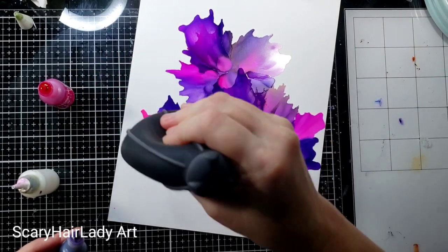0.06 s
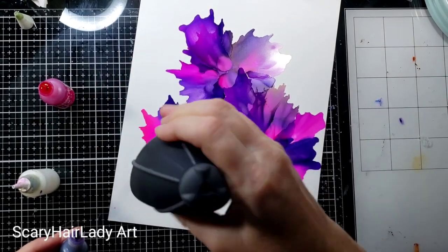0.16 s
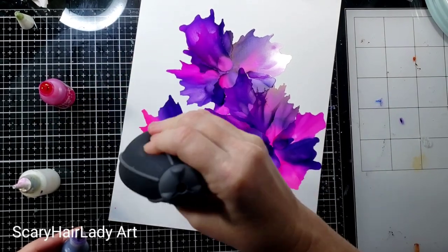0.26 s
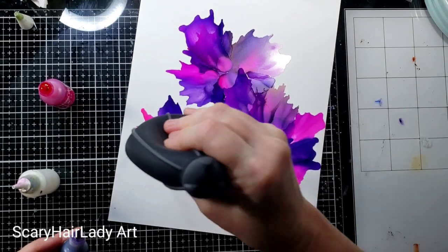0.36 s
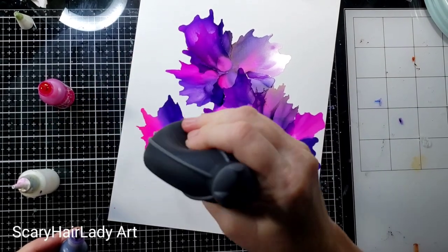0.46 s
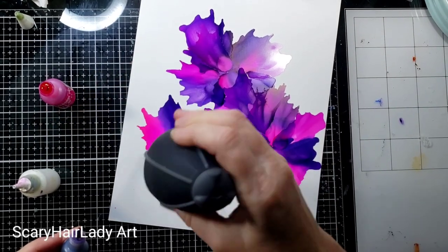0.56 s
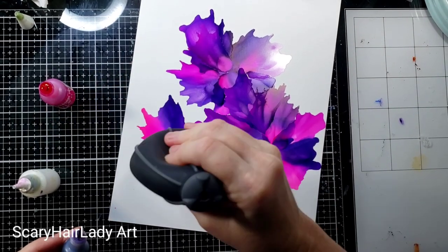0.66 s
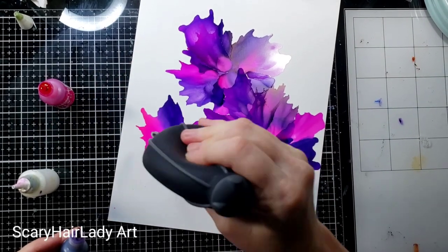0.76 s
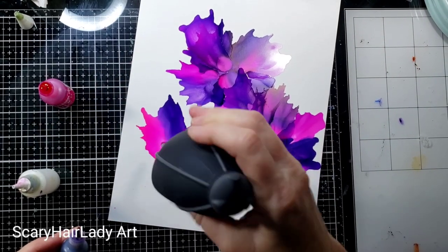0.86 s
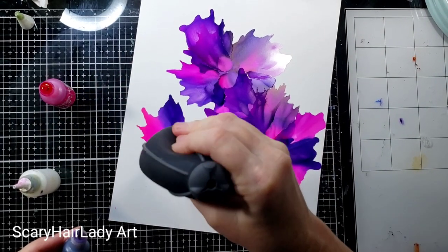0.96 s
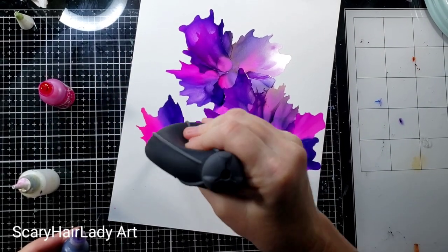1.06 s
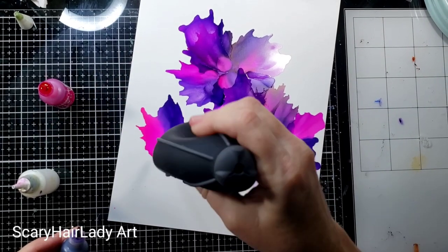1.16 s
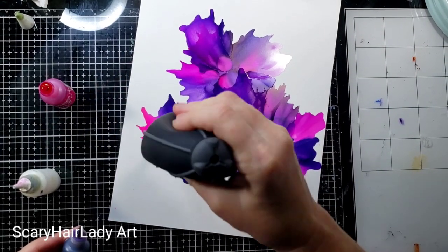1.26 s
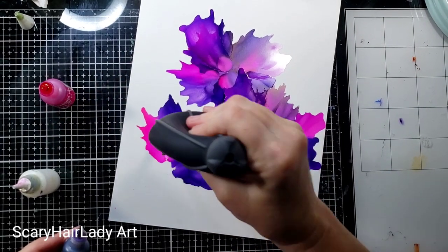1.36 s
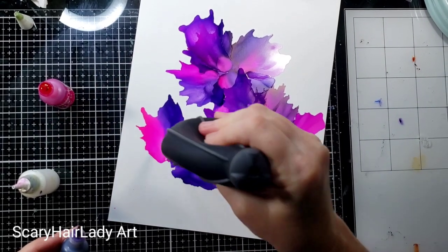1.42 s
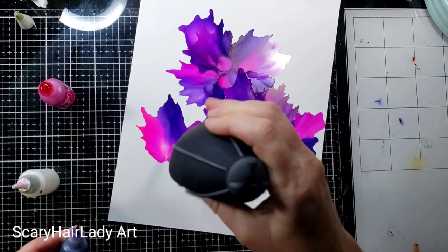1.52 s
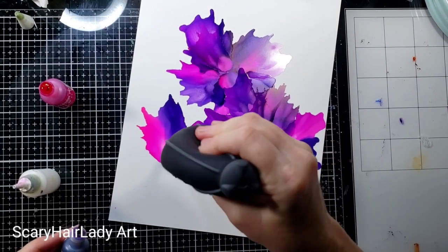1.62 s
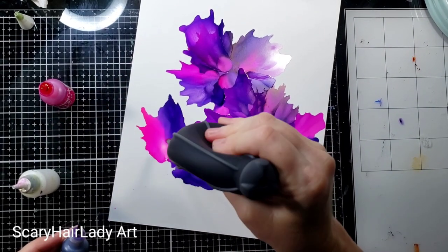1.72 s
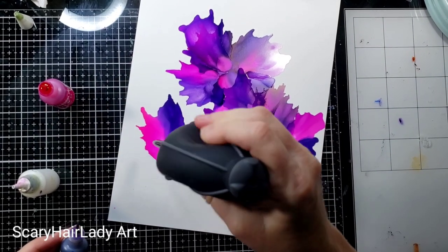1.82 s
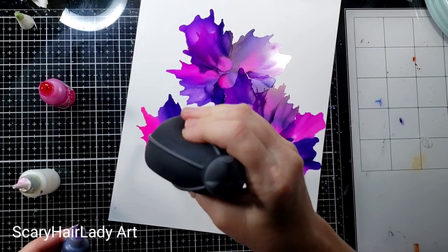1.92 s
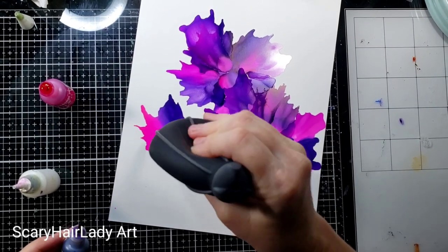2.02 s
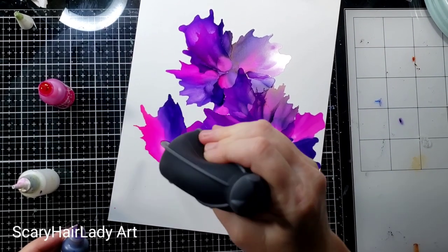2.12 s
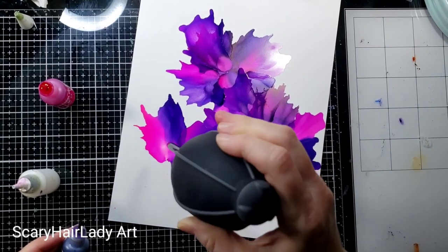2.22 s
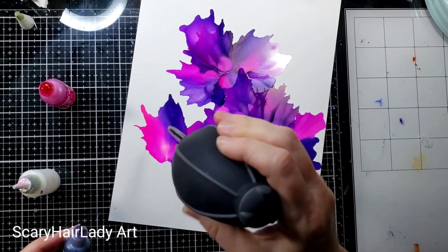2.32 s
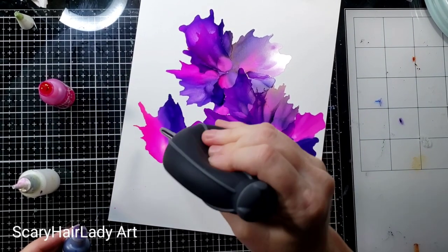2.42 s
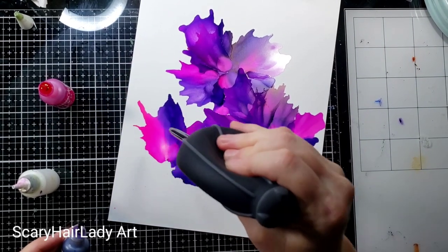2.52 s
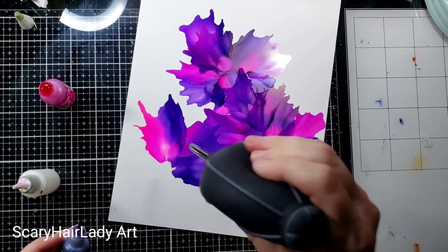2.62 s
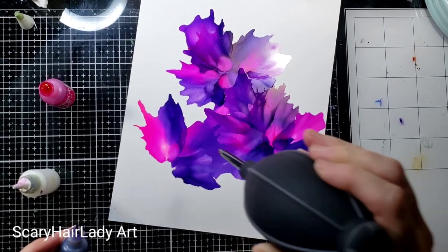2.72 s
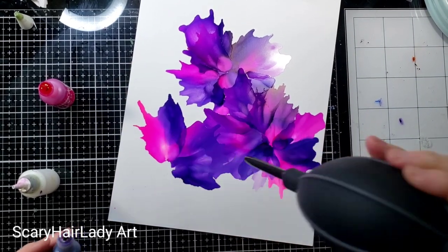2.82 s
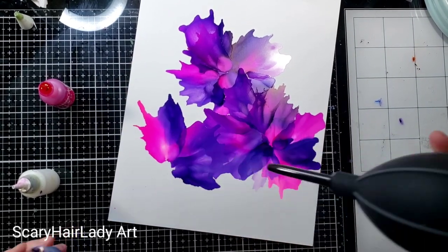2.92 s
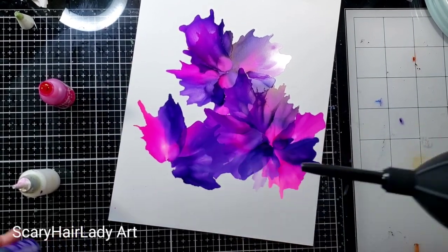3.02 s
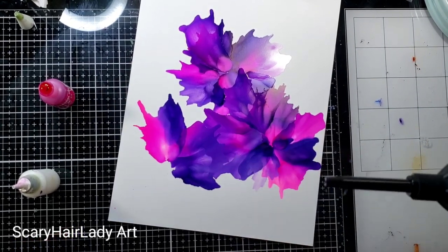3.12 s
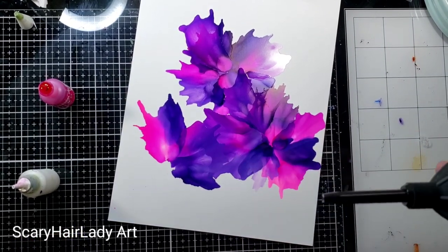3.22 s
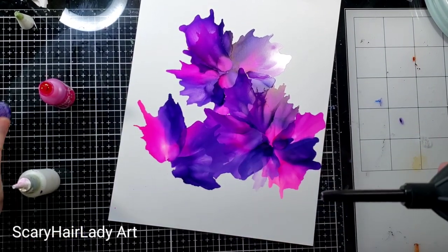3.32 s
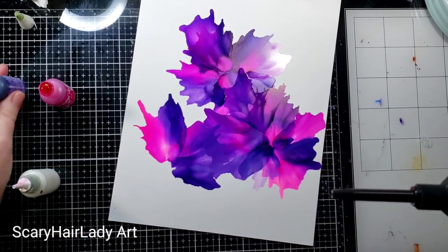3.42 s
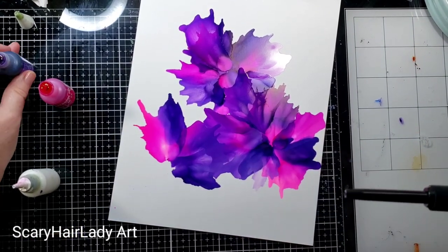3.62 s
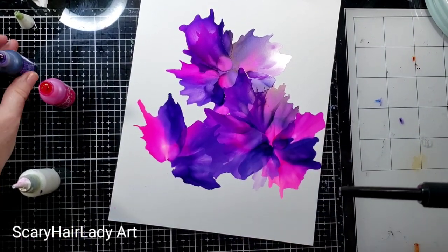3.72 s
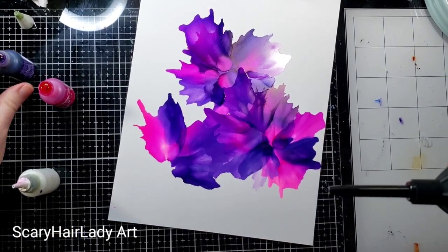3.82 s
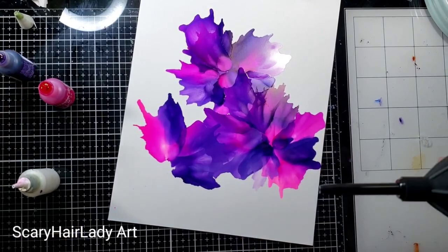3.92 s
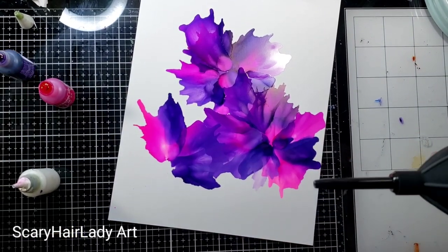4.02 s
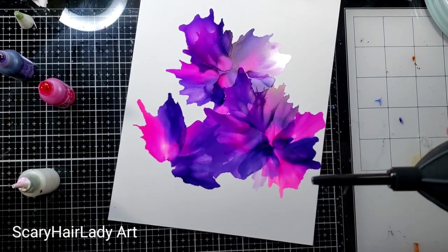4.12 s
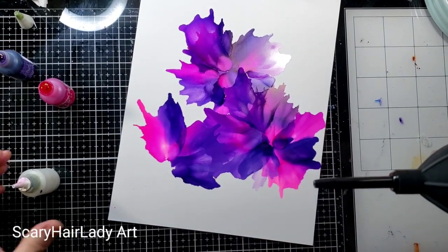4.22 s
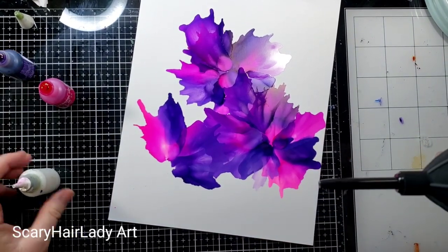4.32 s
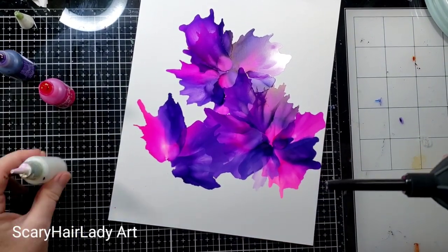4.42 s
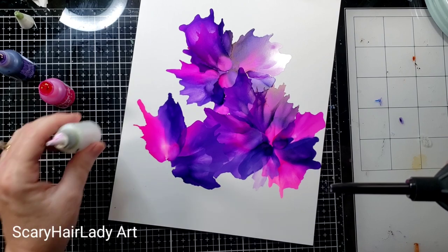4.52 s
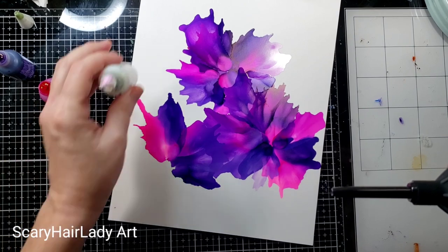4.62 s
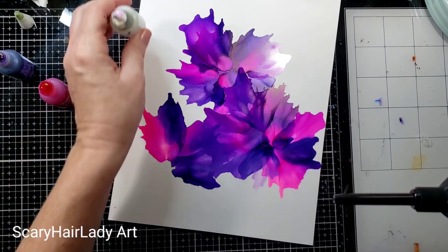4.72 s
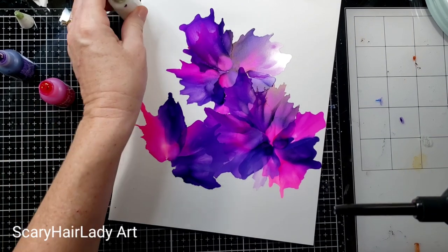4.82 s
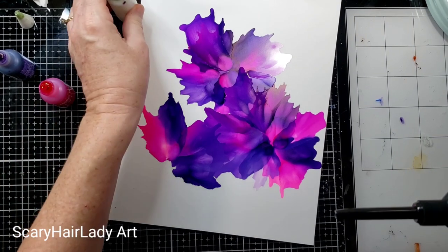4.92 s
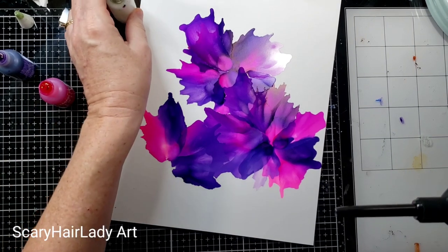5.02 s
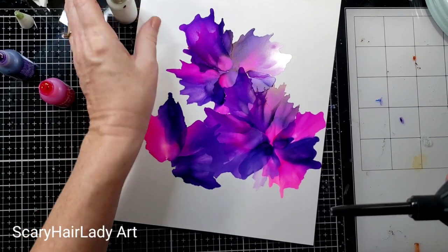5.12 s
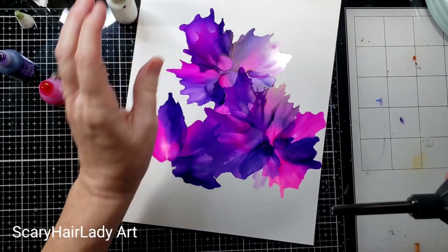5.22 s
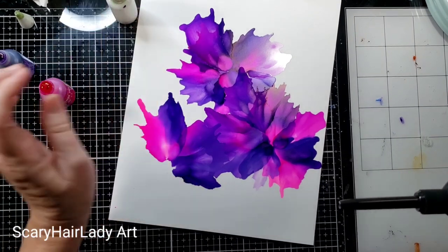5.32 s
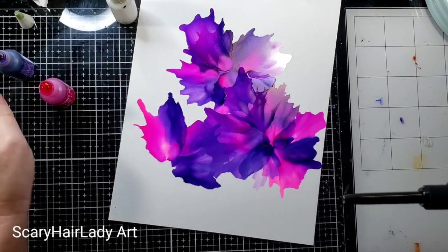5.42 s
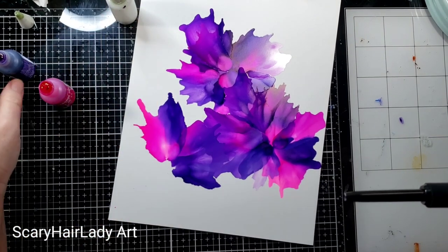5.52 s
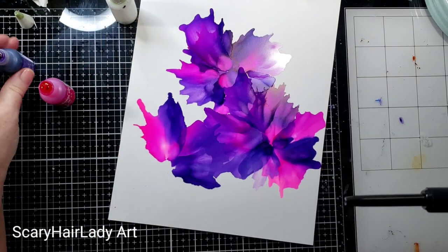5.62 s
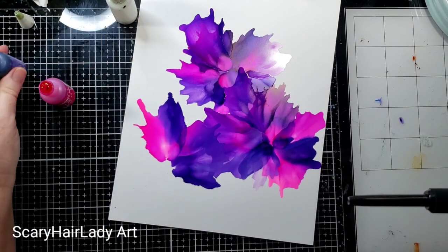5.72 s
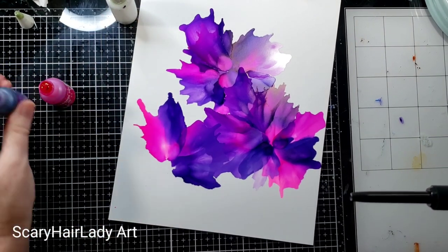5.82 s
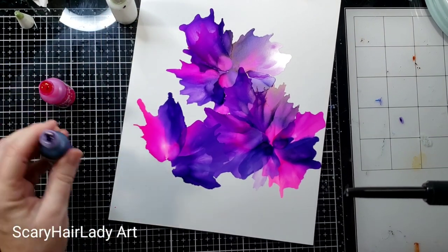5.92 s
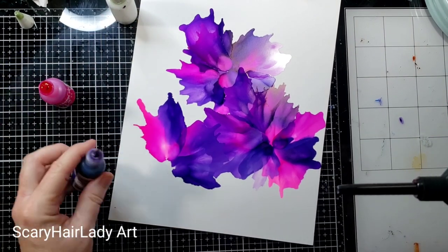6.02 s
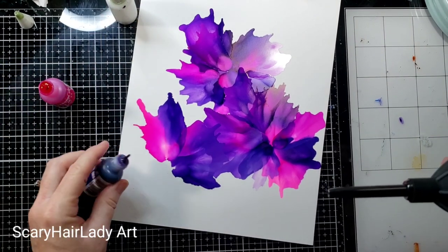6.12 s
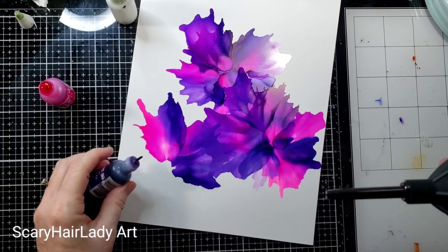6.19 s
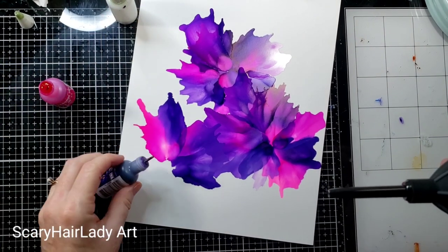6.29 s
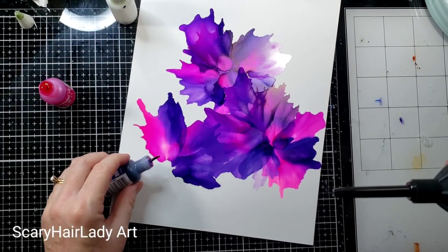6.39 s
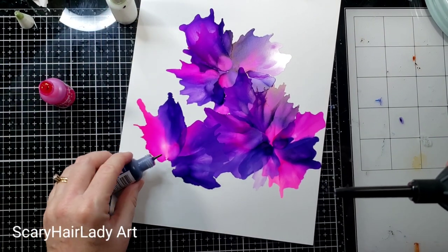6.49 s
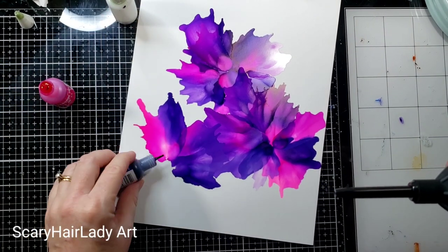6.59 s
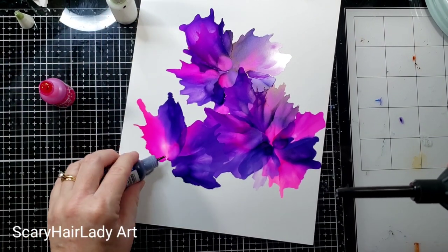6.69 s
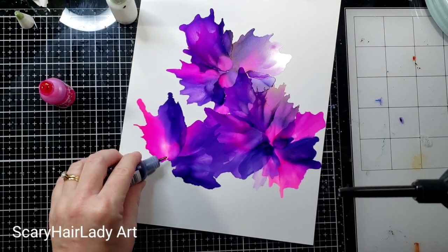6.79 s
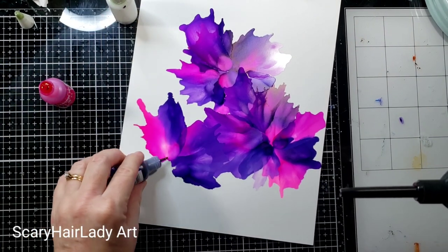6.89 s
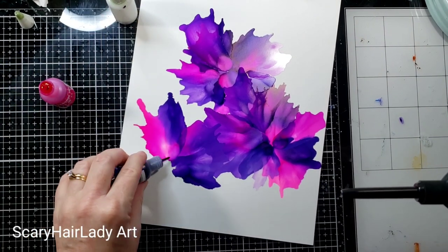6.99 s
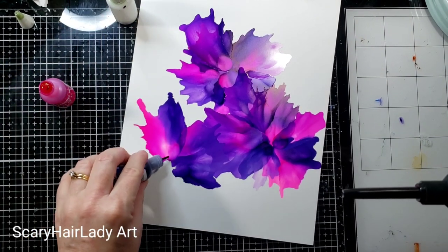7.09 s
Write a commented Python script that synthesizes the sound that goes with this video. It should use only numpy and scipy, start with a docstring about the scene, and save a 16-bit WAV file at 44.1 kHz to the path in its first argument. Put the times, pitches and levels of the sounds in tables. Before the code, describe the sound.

A rubber bulb blower puffs eight sharp, bright bursts of air in steady rhythm, each with a softer suck back, then plastic bottles knock on a table.

```python
"""A rubber bulb blower is squeezed eight times over a craft table: a hissing jet from the nozzle, then a
softer suck through the inlet valve, both coloured noise shaped by pressure or flow. The rubber wall thumps
dully as it buckles and springs back: short pulses ringing damped modes. Then small plastic ink bottles are
set down and handled: struck table modes, clacks, ticks and faint slides. A fan hums in the small room."""
import sys
import numpy as np
from scipy import signal
from scipy.fft import rfft, irfft, next_fast_len
from scipy.io import wavfile

SR = 44100
rng = np.random.default_rng(int(sys.argv[2]) if len(sys.argv) > 2 else 0)


def wav_out(sig):
    """Save sig, one row per channel (or a flat mono array), as 16-bit PCM at SR to the path in sys.argv[1]."""
    wavfile.write(sys.argv[1], SR, np.round(np.clip(np.atleast_2d(sig).T, -1, 1) * 32767).astype(np.int16))


N = 315315
TIME = np.arange(N) / SR
HZ = np.fft.rfftfreq(N, 1 / SR)

# bulb squeezes: full_pressure_s, level_db, buckle_after_s, rush_db (relative to level), rush_centre_hz
STROKES = [(-.012, -26.5, 0.038, -21.5, 2980), (.342, -26.5, 0.033, -24, 2920),
           (0.693, -25.5, 0.031, -26.5, 3140), (1.03, -25, .021, -26.5, 2970),
           (1.351, -25, .018, -27, 3380), (1.681, -27, .025, -20.5, 3450), (2.02, -35.5, 0.032, -13, 2870),
           (2.461, -33.5, 0.04, -17.5, 1780)]
# bulb refills: valve_jerk_s, length_s, level_db, pop_after_s (from the jerk), pop_db, pop_width_s
REFILLINGS = [(0.132, .125, -43, 0.078, -39, 0.00072), (0.486, 0.13, -42.5, 0.076, -33, 0.00073),
              (.833, 0.12, -42, 0.076, -32.5, 0.00067), (1.168, 0.1, -42, 0.079, -32, 0.00067),
              (1.495, 0.11, -40.5, 0.083, -33, 0.00073), (1.824, 0.11, -42, 0.076, -34.5, 0.0021),
              (2.15, 0.13, -40.5, .096, -30.5, 0.002), (2.615, 0.13, -42, 0.078, -30, 0.0027)]
# left-right likeness of the noise: frequency_hz, correlation
LIKENESS = [(30, 1), (80, 0.63), (250, 0.59), (500, 0.32), (1000, 0.04), (2000, 0.092), (15000, 0.057)]


def gain_of(db):
    """Decibels to an amplitude factor."""
    return 10 ** (np.asarray(db) / 20)


def evened(x):
    """Scales to rms 1."""
    return x / np.sqrt(np.mean(x ** 2) + 1e-20)


def read(points, hz):
    """Reads a table on a log-frequency axis."""
    f, value = np.transpose(points)
    return np.interp(np.log(hz + 1), np.log(f + 1), value)


def add(mix, s, sound):
    """Mixes a sound in at time s, cut at the end of the mix."""
    part = mix[..., round(s * SR):][..., :sound.shape[-1]]
    part += sound[..., :part.shape[-1]]


def around(s):
    """The moments within a quarter second of s."""
    return TIME[abs(TIME - s) < 1 / 4]


def arch(t, half_s):
    """A smooth swell that tops at t = 0."""
    return np.exp(-.5 * (t / half_s) ** 2)


def hump(hz, centre_hz, octaves):
    """A broad band around a centre, down to half at the given octaves away."""
    return 1 / (1 + (np.log2((hz + 1) / centre_hz) / octaves) ** 2)


def drift(rate_hz):
    """A random curve of rms 1, low-passed at rate_hz."""
    return evened(irfft(rfft(rng.standard_normal(N)) / (1 + (HZ / rate_hz) ** 4), N))


def flutter(depth_db, rate_hz):
    """A gain that wanders at random."""
    return gain_of(depth_db * drift(rate_hz))


def likeness_mix(a, b, hz):
    """Mixes b with a so that it resembles a as much as the likeness table says."""
    same = np.clip(read(LIKENESS, hz), -1, 1)
    same = same.reshape(same.shape + (1,) * (a.ndim - 1))
    return same * a + np.sqrt(1 - same ** 2) * b


def coloured(shape, size):
    """Stereo noise of rms 1 whose spectrum is the function shape, nearly mono in the deepest bass."""
    full_size = next_fast_len(size, real=True)
    hz = np.fft.rfftfreq(full_size, 1 / SR)
    a, b = rng.standard_normal((2, len(hz))) + 1j * rng.standard_normal((2, len(hz)))
    pair = np.array([a, likeness_mix(a, b, hz)]) * shape(hz)
    return evened(irfft(pair, full_size)[:, :size])


def hiss(spectrum, size=N):
    """Noise coloured by a (frequency_hz, level_db) table."""
    return coloured(lambda hz: gain_of(read(spectrum, hz)), size)


def room(x, wet_db):
    """Adds a diffuse tail, each band dying at its own speed."""
    # frequency_hz, t60_s
    decays = [(100, 0.37), (400, 0.11), (1500, 0.3), (3500, 0.24), (7000, 0.2), (15000, 0.18)]
    hz, t, z = signal.stft(rng.standard_normal((2, SR // 2)), SR, nperseg=256)
    z[1] = likeness_mix(z[0], z[1], hz)
    decay = gain_of(-60 * t / read(decays, hz)[:, None])
    tail = signal.istft(z * decay, SR, nperseg=256)[1]
    tail[:, :SR // 250] = 0  # no tail in the first 4 ms
    tail /= np.linalg.norm(tail[0])
    return x + gain_of(wet_db) * signal.fftconvolve(x, tail, axes=1)[:, :N]


def reflect(x, surfaces):
    """Adds single reflections, one delay for each side."""
    out = x.copy()
    for left_s, right_s, share in surfaces:
        add(out[0], left_s, share * x[0])
        add(out[1], right_s, share * x[1])
    return out / np.sqrt(1 + sum(row[2] ** 2 for row in surfaces))


def bounce(x, count=4):
    """Table, paper and hand return the hiss within a few ms and comb it anew as the bulb moves."""
    crossfeed, left_lead_s = 0.39, .0001  # same turbulence on both sides; the blower is nearer the left
    echo_share, swing_s_per_s = 0.85, .001
    t = TIME[:x.shape[1]]
    out = x + crossfeed * x[::-1]
    out[0] = np.roll(out[0], -round(left_lead_s * SR))
    fine_t = np.arange(4 * len(t)) / (4 * SR)
    for side in out:
        fine = signal.resample_poly(side, 4, 1)  # finer steps for the gliding delays
        for delay_s, swing in rng.uniform((.0004, -1), (.0036, 1), (count, 2)):
            echo_t = t - delay_s - swing_s_per_s * swing * (t - t.mean())
            side += echo_share * np.interp(echo_t, fine_t, fine, left=0, right=0)
    return evened(out)


def fan():
    """A wavering low hum of separate tones in a steady wash of air."""
    # fan tones: pitch_hz, level_db, wander_hz
    tones = [(77.8, -58.5, 2.99), (237.8, -60, 2.472), (489.5, -75, 2.08), (609, -77, 3.94)]
    # air wash: frequency_hz, level_db (per Hz, relative)
    air_spectrum = [(25, -33), (40, -10.5), (52, -2.5), (68, -3), (100, -11), (128, -2.5), (190, -5),
                    (260, -4.5), (350, -7.5), (600, -13.5), (900, -20.5), (1200, -21.5), (1650, -17.5),
                    (2500, -30), (6500, -43), (9500, -43), (12000, -35), (15500, -36)]
    hum = np.zeros(N)
    for pitch_hz, level_db, wander_hz in tones:
        wavering_hz = pitch_hz + wander_hz * drift(10.45)
        tone = np.sin(2 * np.pi * np.cumsum(wavering_hz) / SR)
        hum += gain_of(level_db) * evened(tone * flutter(2.04, 9.9))
    wash = gain_of(-58) * hiss(air_spectrum) * flutter(0.073, 6.4)
    return hum * gain_of([[-2.3], [1.3]]) + wash * gain_of([[-.6], [.6]])


def fingers():
    """Faint grainy slides of skin over the bulb, and of bottles over the mat: fluttering band noise."""
    # slides: peak_s, level_db, half_length_s, centre_hz
    slides = [(4.612, -62.5, .024, 15400), (4.669, -58, 0.035, 143), (4.723, -74.5, 0.15, 14100),
              (5.049, -71, 0.11, 14000), (5.159, -66, 0.055, 1480), (5.188, -53.5, 0.085, 282),
              (5.284, -56.5, 0.032, 580), (5.654, -73.5, 0.077, 12000), (6.11, -70.5, .036, 1840),
              (6.156, -57.5, 0.03, 247), (6.401, -75, .04, 10500)]
    out = np.zeros((2, N))
    for s, level_db, half_s, centre_hz in slides:
        t = around(s)
        grain = coloured(lambda hz: hump(hz, centre_hz, octaves=0.88) ** 2, len(t))
        add(out, t[0], gain_of(level_db) * arch(t - s, half_s) * grain)
    return out * flutter(2.2, 120)


def shell(hz):
    """The broad resonances of a damped plastic bottle."""
    # centre_hz, width_hz, level_db
    resonances = [(2540, 300, -4), (2673, 67, 7), (3840, 300, -5.5), (4380, 300, -20.5), (5040, 380, -6)]
    return sum(gain_of(db) / (1 + (2 * (hz - centre) / width) ** 2) for centre, width, db in resonances)


def struck(modes, t, build_cycles, weight=1):
    """Modes that swell over build_cycles and die; the higher ones reach the two sides out of step."""
    hz, db, t60 = np.transpose(modes)[:, :, None]
    phase, offset = rng.uniform(-np.pi, np.pi, (2, len(modes), 1))
    spread = np.minimum(hz / 1100, .8) * np.sign(offset)
    ring = weight * gain_of(db - 60 * t / t60) * (1 - np.exp(-t * hz / build_cycles))
    angle = 2 * np.pi * hz * t + phase
    return np.array([(ring * np.sin(angle + side * spread)).sum(0) for side in (-1, 1)])


def bottles():
    """A bottle's base thuds and rings the table in a band set by contact hardness; the plastic ticks on top."""
    # knocks: start_s, level_db, strongest_hz, breadth_octaves, thud_db, shell_db, tick_db
    # (each level separate, not added to level_db)
    knocks = [(3.556, -31.5, 976, 0.9, -40, -40.5, -50), (3.567, -27.5, 394, 0.16, -42, -65, -70),
              (4.399, -35, 950, 0.74, -48, -57, -41), (4.402, -33.5, 1790, 0.18, -61, -59, -57),
              (4.94, -30, 766, 1.9, -27.5, -41, -40.5), (5.102, -39, 1500, 0.94, -38.5, -63, -76),
              (5.142, -41, 1400, 2, -40.5, -59, -56), (5.193, -47.5, 1530, .65, -55, -65, -76),
              (5.694, -54, 565, 0.69, -53, -75, -82), (6.063, -58, 1800, 1.6, -44.5, -65, -66)]
    # ring of the table: pitch_hz, level_db, t60_s
    table_modes = [(404, 5, 0.045), (428, 3, 0.049), (506, -4.5, 0.17), (583, -5.5, 0.18),
                   (753, -9.5, 0.26), (791, -6.5, 0.13), (928, -22, 0.27), (1105, -15, 0.16),
                   (1152, -2.5, 0.096), (1334, -14.5, 0.072), (1436, -2, 0.056), (1490, -10, 0.12),
                   (1700, -7, 0.075), (2010, -45, 0.064)]
    # table top flexing as a whole: pitch_hz, level_db, t60_s
    thud_modes = [(153.7, -10.5, 0.11), (212.6, -17, 0.23), (256.6, -5, 0.083), (277, -3.5, 0.087),
                  (320, -9.5, 0.12)]
    # plastic tick: frequency_hz, level_db (per Hz, relative)
    tick_spectrum = [(500, 18), (2000, 21), (3200, 6), (5000, 7.5), (7500, -0.5), (10000, 1), (12500, 8),
                     (15500, 9.5)]
    # nearby surfaces: left_delay_s, right_delay_s, share
    surfaces = [(.0037, 0.0076, 0.45), (.0083, 0.0077, 0.76), (0.0142, 0.015, 0.48), (0.0194, .0176, .36),
                (.0262, .0281, 0.36)]
    clack_decay_s, tick_decay_s = 0.0071, 0.017
    mode_hz = np.array(table_modes)[:, :1]
    t, ticks = TIME[:SR // 3], np.zeros(N)
    clacks, thuds = np.zeros((2, 2, N))
    for s, level_db, centre_hz, breadth, thud_db, shell_db, tick_db in knocks:
        ring = struck(table_modes, t, build_cycles=2.9, weight=hump(mode_hz, centre_hz, breadth))
        thud = struck(thud_modes, t, build_cycles=3.4)
        chatter = coloured(
            lambda hz: hump(hz, centre_hz, 0.7 * breadth) ** 2 / (1 + (hz / 2600) ** 4), len(t))
        clack = gain_of(level_db - 3.5) * chatter + gain_of(shell_db) * coloured(shell, len(t))
        add(clacks, s, clack * np.exp(-t / clack_decay_s))
        add(thuds, s, gain_of(level_db + 0.5) * ring + gain_of(thud_db + 7.5) * thud)
        add(ticks, s, gain_of(tick_db) * np.exp(-t / tick_decay_s))
    return thuds + reflect(clacks, surfaces) + hiss(tick_spectrum) * ticks


def flexes():
    """Three thumps a stroke, as (s, pressure, width_s): the wall caves in, the valve jerks it, it pops out."""
    width_s = 0.00067
    buckles = [(s + buckle_s, -gain_of(-39), width_s) for s, _, buckle_s, *_ in STROKES]
    jerks = [(s, -gain_of(-38.5), width_s) for s, *_ in REFILLINGS]
    pops = [(s + after_s, gain_of(pop_db), pop_s) for s, _, _, after_s, pop_db, pop_s in REFILLINGS]
    return buckles + jerks + pops


def wall():
    """The rubber buckles, jerks or pops out: one pressure pulse, then a short damped wobble."""
    # ring of the bulb after a flex: pitch_hz, level_db, t60_s
    rubber_modes = [(80.2, -10.5, 0.24), (132.2, -12.5, 0.083), (189.7, -16.5, 0.017), (280.4, -6, 0.048),
                    (380.7, -11.5, 0.076)]
    t, out = np.arange(-SR // 100, SR // 5) / SR, np.zeros(N)
    after = t[t >= 0]
    ring = sum(gain_of(db - 60 * after / t60) * np.cos(2 * np.pi * hz * after)
               for hz, db, t60 in rubber_modes)
    for s, peak, width_s in flexes():
        pulse = arch(t, width_s)
        wobble = signal.fftconvolve(pulse / pulse.sum(), ring)[:len(t)]
        add(out, s + t[0], peak * (0.46 * pulse + 1.85 * wobble))
    # a body so small gives off little deep bass
    radiated = irfft(rfft(out) * HZ ** 3 / (HZ ** 3 + 58 ** 3), N)
    return np.array([radiated, radiated])


def inlet():
    """The valve ticks open, and the swelling bulb sucks an almost even stream through it."""
    # suck noise: frequency_hz, level_db (per Hz, relative)
    suck_spectrum = [(400, -9.5), (1300, -17), (2100, -7), (2900, -13), (4300, -2.5), (5600, -4), (6400, 2),
                     (7800, 0), (9400, -4), (10500, 0.5), (11500, 0), (12600, 4), (13500, 1.5), (15000, 2)]
    taper_share, rise_db_per_s = 0.44, 8  # the flow swells, stays almost even and dies as the bulb fills
    tick_lead_s, tick_db, tick_decay_s = .005, -51, 0.0063  # the flap ticks just before it jerks the wall
    out = np.zeros((2, N))
    for s, length_s, level_db, *_ in REFILLINGS:
        t = TIME[:round(length_s * SR)]
        swell = signal.windows.tukey(len(t), taper_share)
        flow = gain_of(level_db + rise_db_per_s * (t - t.mean())) * swell
        stream = bounce(hiss(suck_spectrum, SR // 4))[:, :len(t)]
        add(out, s, stream * flow)
        add(out, s - tick_lead_s, stream * gain_of(tick_db) * np.exp(-t / tick_decay_s))
    return out * gain_of([[-1], [1]])


def squeeze(t, buckle_s):
    """Pressure in the bulb, which tops at t = 0: a firm grip, then an easing off."""
    rise_s, grip_power = 0.04, 2.5  # a power above 2 closes more abruptly than a bell curve
    fall_s = 0.025 + .44 * buckle_s  # a squeeze slower to buckle the wall also dies more slowly
    grip = np.exp(-.5 * abs(t / rise_s) ** grip_power)
    return np.where(t < 0, grip, arch(t, fall_s))


def nozzle():
    """Each squeeze drives a turbulent jet; its bright hiss grows faster with pressure than its rush."""
    # jet noise: frequency_hz, level_db (per Hz, relative)
    jet_spectrum = [(300, -52), (1000, -39), (2200, -43), (3000, -28.5), (3800, -16.5), (4800, -22.5),
                    (5600, -14), (7200, -11), (8200, -11.5), (10000, -7), (10900, -6.5), (11700, -3),
                    (12900, -5.5), (15500, -2.5)]
    bright, rush = np.zeros((2, 2, N))
    for s, level_db, buckle_s, rush_db, rush_hz in STROKES:
        t = around(s)
        pressure = squeeze(t - s, buckle_s)
        jet = bounce(hiss(jet_spectrum, len(t)))
        splash = bounce(coloured(lambda hz: hump(hz, rush_hz, octaves=1.53) ** 2, len(t)))
        add(bright, t[0], gain_of(level_db) * jet * pressure ** 1.81)
        add(rush, t[0], gain_of(level_db + rush_db) * splash * pressure)
    # the jet is beamed at the paper, while its rush spreads into the room
    beamed = room(bright * flutter(0.57, 250), wet_db=-9.5) * gain_of([[-.2], [.3]])
    return beamed + room(rush * flutter(0.9, 44.0), wet_db=-4.5)


def scene():
    """Fan, bottles and blower in one small room."""
    blower = room(wall(), wet_db=-3.0) + room(inlet(), wet_db=-9.5) + nozzle()
    return fan() + fingers() + room(bottles(), wet_db=-9) + blower


def record(dry):
    """The microphone sheds the deep bass; then a low-pass limits the band."""
    corner_hz, edge_hz = 40, 15700
    ratio = HZ / corner_hz
    thin = irfft(rfft(dry) * ratio ** 4 / np.sqrt(1 + ratio ** 8), N)
    low_pass = signal.firwin(511, edge_hz, window=("kaiser", 9), fs=SR)
    return signal.oaconvolve(thin, low_pass[None], "same")


dry = scene()
out = record(dry)
wav_out(out)
```